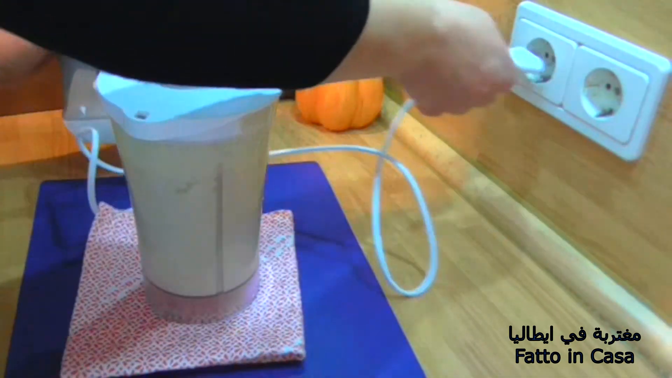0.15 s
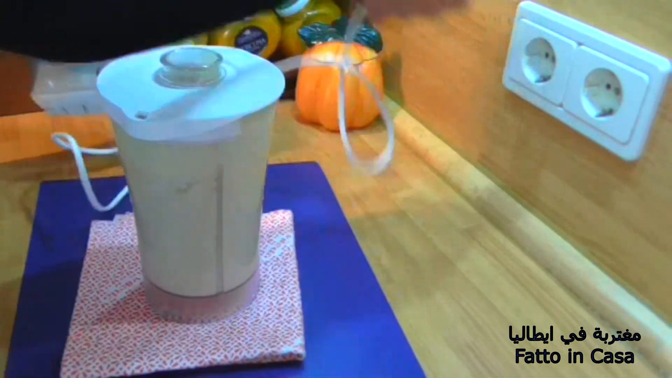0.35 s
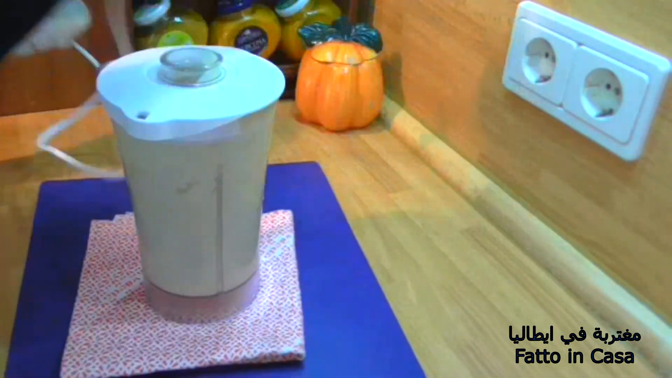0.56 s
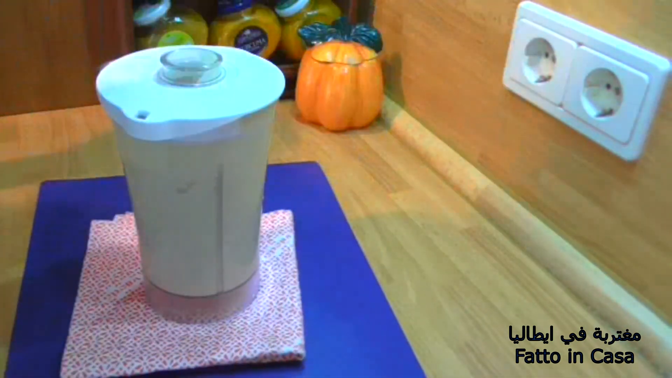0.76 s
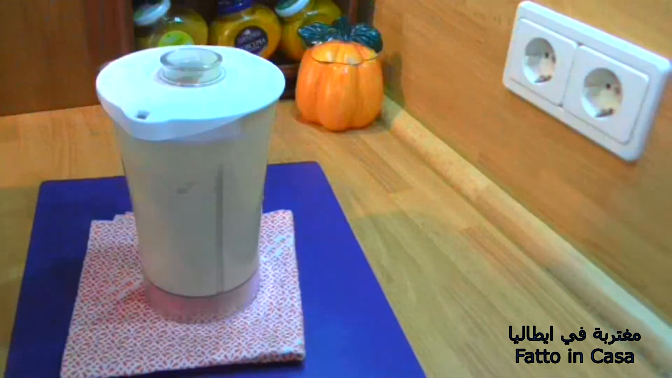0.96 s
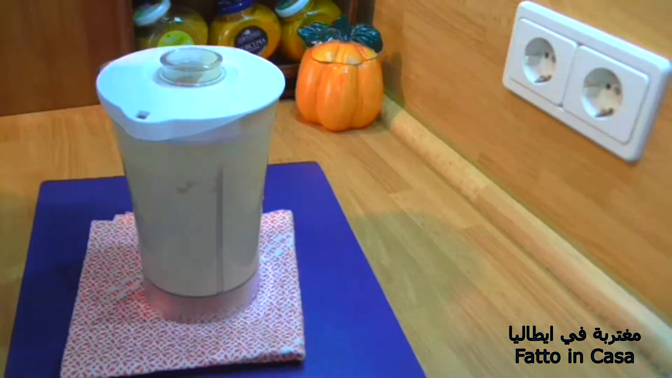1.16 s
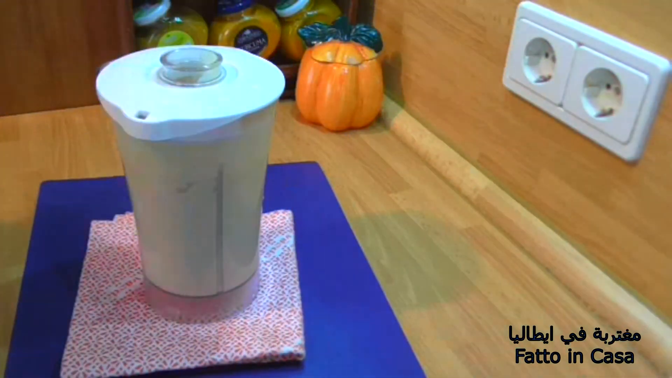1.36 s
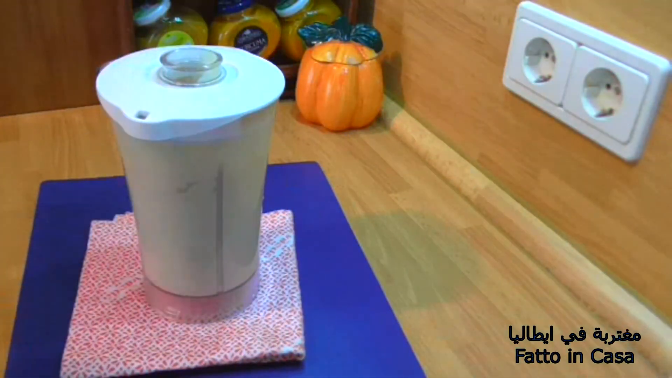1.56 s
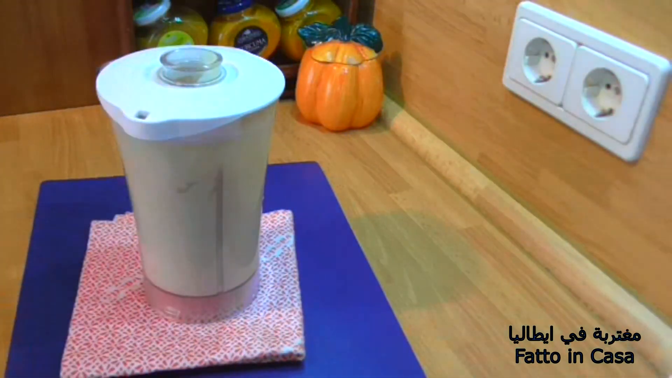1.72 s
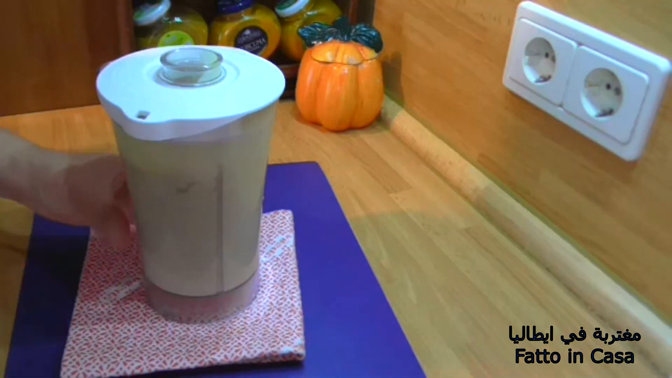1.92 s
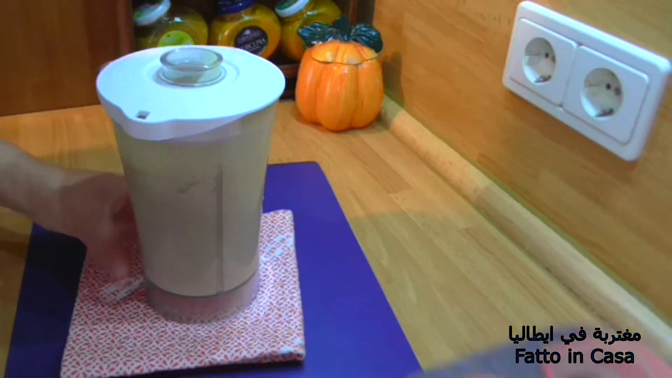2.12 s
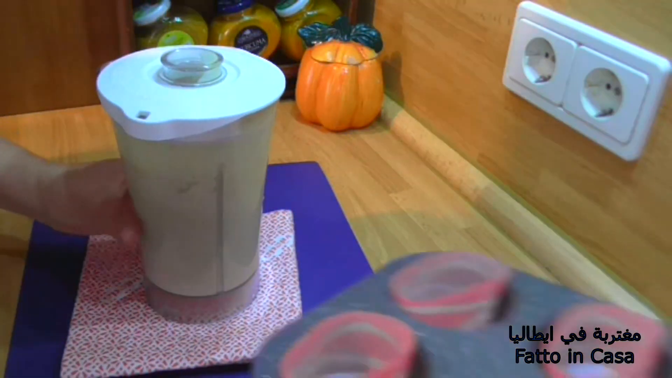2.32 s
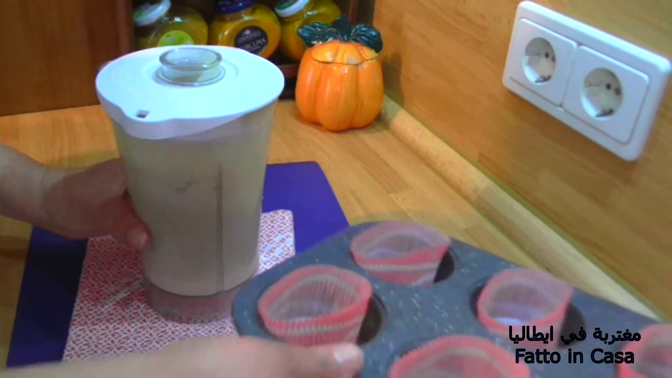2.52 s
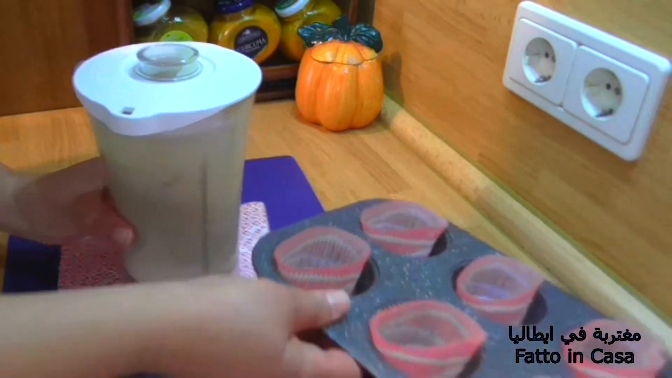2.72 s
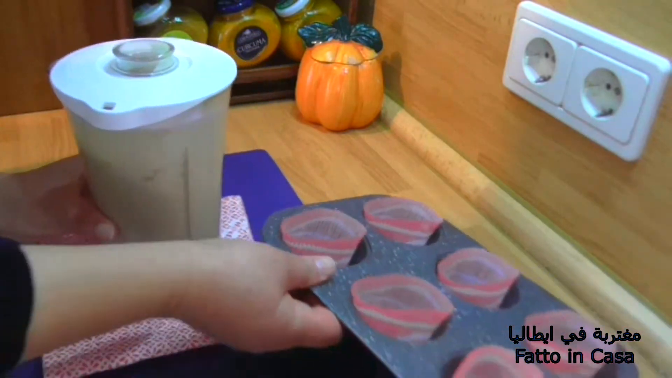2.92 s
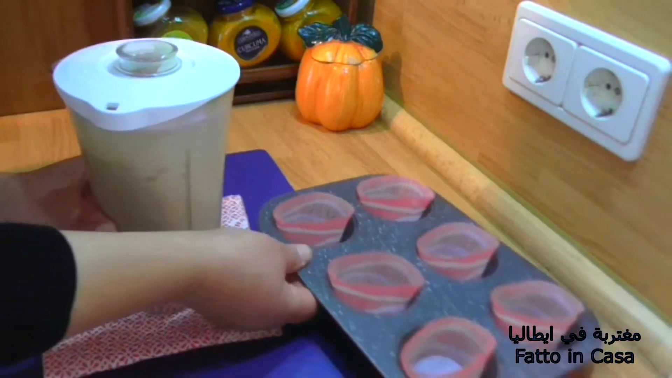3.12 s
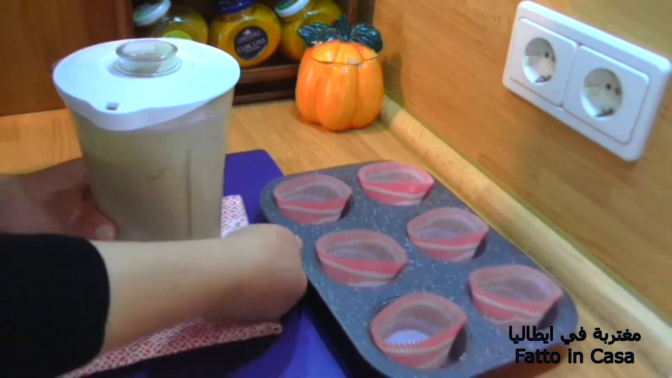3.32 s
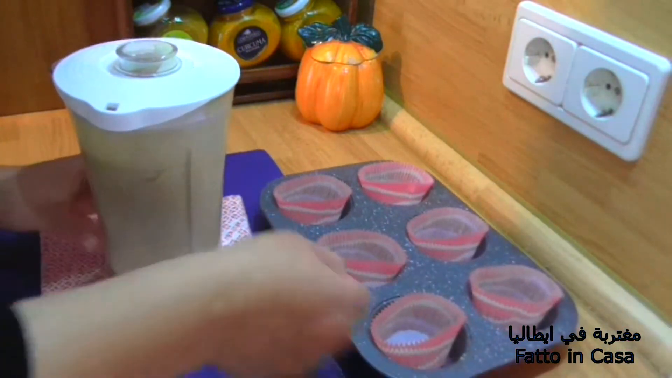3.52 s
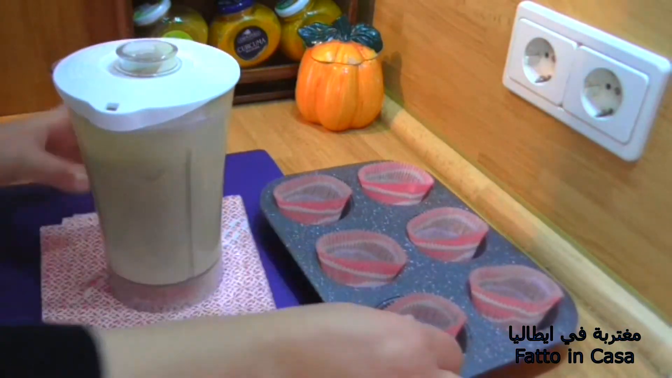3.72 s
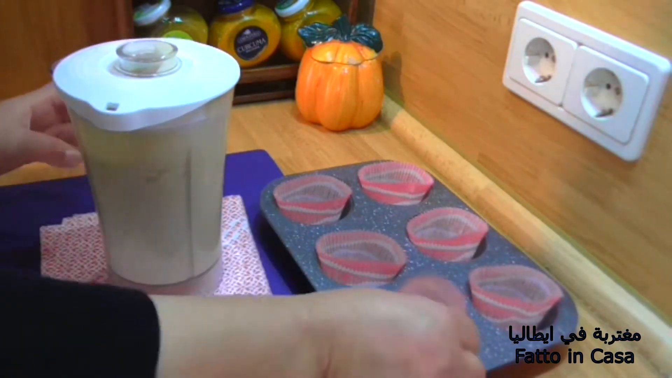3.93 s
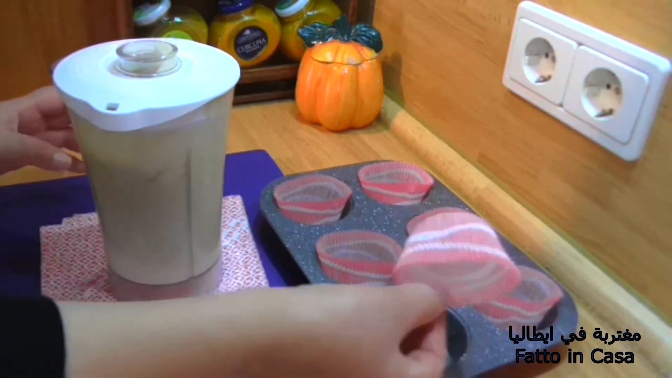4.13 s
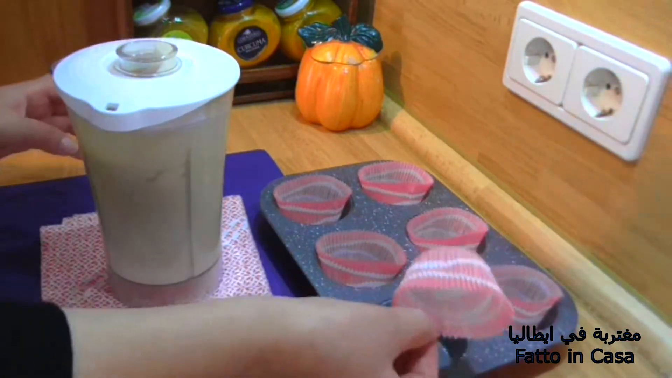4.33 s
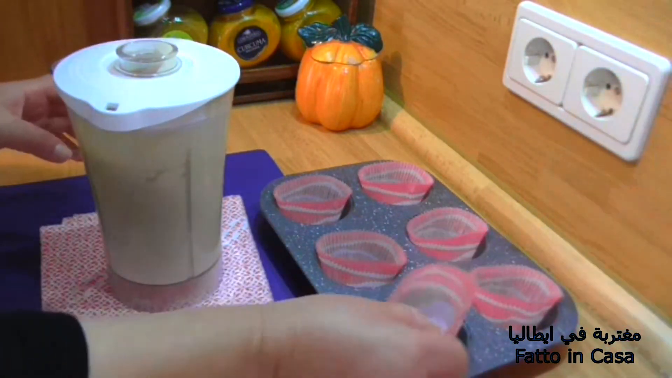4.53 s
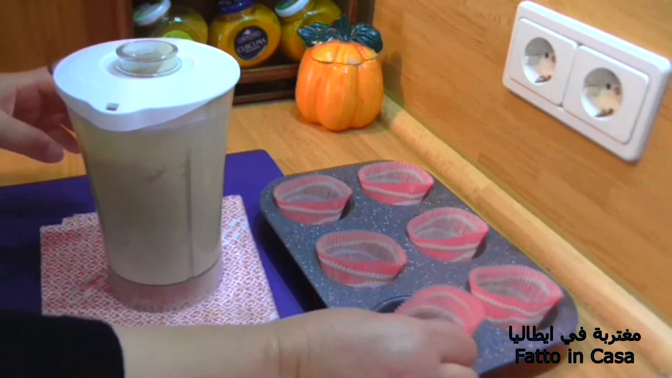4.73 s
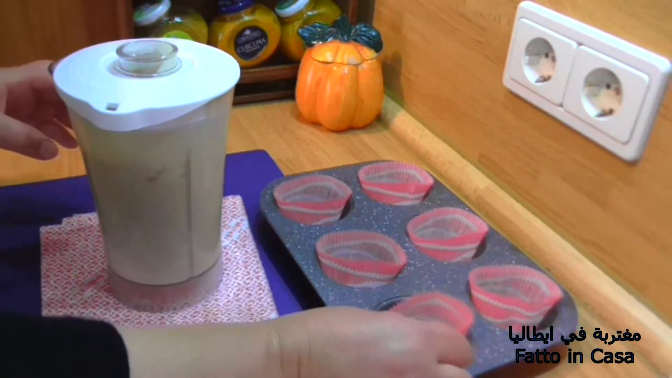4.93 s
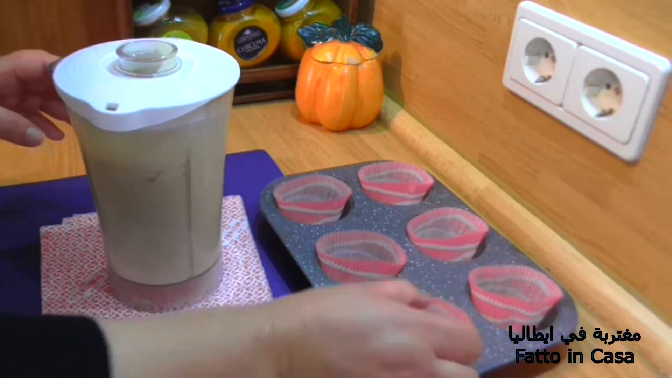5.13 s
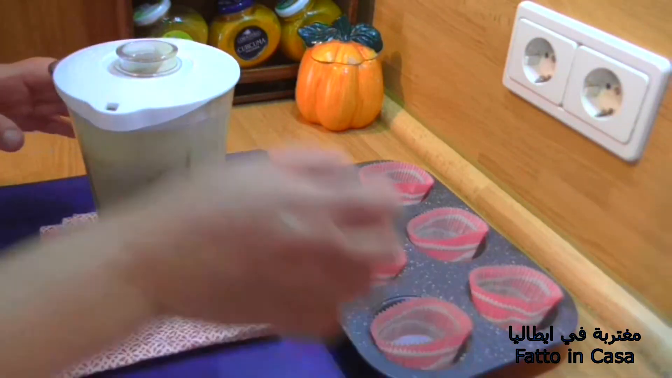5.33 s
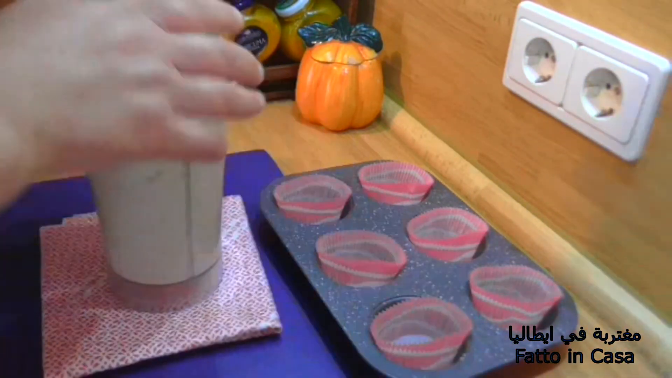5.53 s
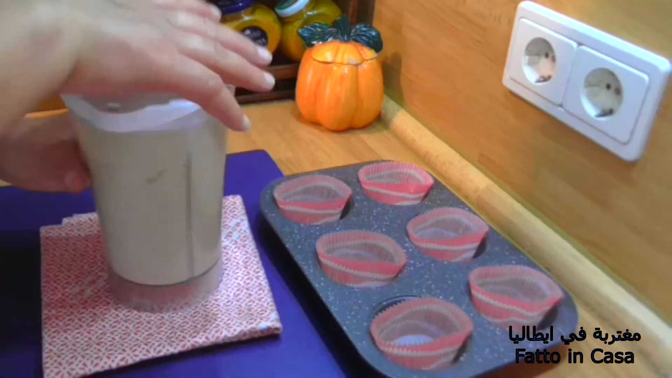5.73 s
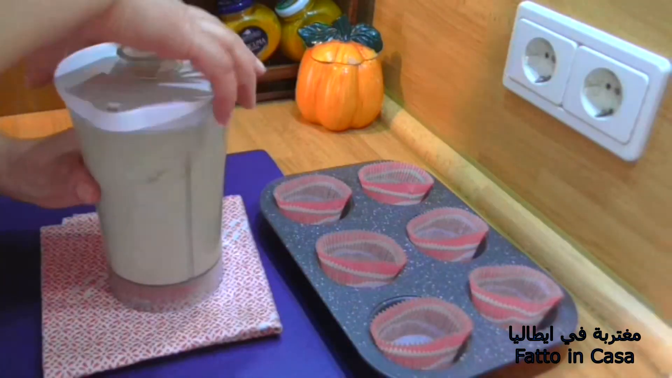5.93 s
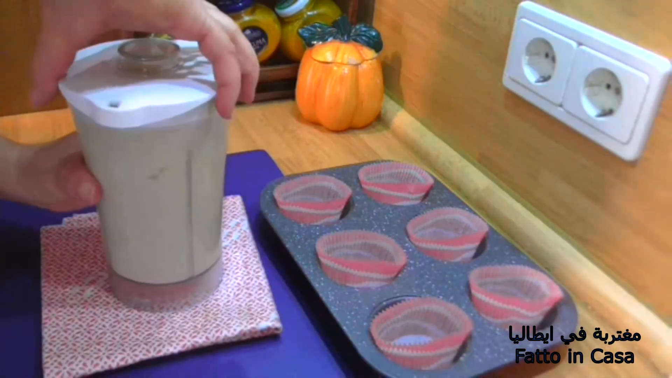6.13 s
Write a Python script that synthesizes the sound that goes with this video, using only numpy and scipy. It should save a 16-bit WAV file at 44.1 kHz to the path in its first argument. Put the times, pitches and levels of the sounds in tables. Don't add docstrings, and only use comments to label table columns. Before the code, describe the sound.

Hands work near a small microphone at a kitchen counter with short, bright echoes. First come sharp socket clicks and hard plastic knocks on wood, then a soft rising cable swish. A steel tin scrapes and rings briefly, then lands loudly with a clanging cluster and low counter thuds. Crisp paper crackles follow in two bouts, with sleeves brushing softly and very light plastic taps near the end.

```python
import sys
import numpy as np
from scipy import signal
from scipy.fft import rfft, irfft, next_fast_len
from scipy.io import wavfile
from scipy.ndimage import uniform_filter1d, map_coordinates

SR = 44100
rng = np.random.default_rng(int(sys.argv[2]) if len(sys.argv) > 2 else 0)


def dump(signal):
    limited = np.clip(np.atleast_2d(signal).T, -1, 1)
    pcm = np.round(limited * 32767).astype(np.int16)
    wavfile.write(sys.argv[1], SR, pcm)


def undo_db(level):
    steps = np.asarray(level, float) / 20
    return 10 ** steps


N = 276066
T = np.arange(SR * 2 // 5) / SR


def unit(x):
    return x / np.sqrt(np.mean(x ** 2) + 1e-20)


def along(points, hz):
    f, v = np.transpose(points)
    return np.interp(np.log(hz + 1), np.log(f + 1), v)


def curves(rows):
    s, *cols = np.transpose(rows)
    return [np.interp(np.arange(N) / SR, s, c, left=-150, right=-150) for c in cols]


def wobble(rate):
    knots = rng.standard_normal(int(N * rate / SR) + 4)
    return map_coordinates(knots, [np.arange(N) * rate / SR])


def filtered(x, response):
    n = x.shape[-1]
    m = next_fast_len(n + min(n, SR // 2))
    return irfft(rfft(x, m) * response(np.fft.rfftfreq(m, 1 / SR)), m)[..., :n]


def colour(spectrum):
    def response(hz):
        cep = irfft(np.log(undo_db(along(spectrum, hz)) + 1e-6))
        cep[1:len(hz) - 1] *= 2
        cep[len(hz):] = 0
        return np.exp(rfft(cep))
    return response


def resonant(peaks):
    def response(f):
        total = 0
        for k, (hz, width, db) in enumerate(peaks):
            total = total + (-1) ** k * undo_db(db) * 1j * f * width / (hz * hz - f * f + 1j * f * width)
        return total
    return response


def steep(peaks):
    top_hz = 1.2 * max(p[0] for p in peaks)
    return lambda f: resonant(peaks)(f) / (1 + 1.2j * f / top_hz - (f / top_hz) ** 2)


def ringing(spectrum, hz, width_hz, boost_db):
    return lambda f: colour(spectrum)(f) * (1 + undo_db(boost_db) * resonant([(hz, width_hz, 0)])(f))


def widths(modes):
    return [(hz, np.log(1000) / np.pi / t60, db) for hz, db, t60 in modes]


def burst(response, t60):
    n = SR // 5
    push = undo_db(-60 * T[:n] / t60) * rng.standard_normal(n)
    push[0] = 1.36
    x = filtered(push, response)
    return x / np.abs(x).max()


def ring(modes, free, spread_db, detune):
    x = np.zeros(len(T))
    for hz, db, t60 in modes:
        luck, shift = rng.standard_normal(2)
        decay = undo_db(db + spread_db * luck - 60 * T / (free * t60))
        x += decay * np.sin(2 * np.pi * hz * (1 + detune * shift) * T)
    x *= 1 - np.exp(-T / 0.0009)
    return x / np.abs(x).max()


def add(track, s, sound):
    part = track[round(s * SR):][:len(sound)]
    part += sound[:len(part)]


def gritty(rate, depth_db):
    return undo_db(depth_db * wobble(rate)) * rng.standard_normal(N)


def patchy(x, patchy_db):
    z = signal.stft(x, nperseg=256)[2]
    field = uniform_filter1d(rng.standard_normal(z.shape), size=4, axis=0)
    field = uniform_filter1d(field, size=8, axis=1)
    return signal.istft(z * undo_db(patchy_db * unit(field)), nperseg=256)[1][:N]


def strokes(rows, slower=1):
    t = np.arange(0, N / SR, 0.001)
    gain = np.zeros(len(t))
    for s, db, rise, fall in rows:
        away = np.where(t < s, (s - t) / rise, (t - s) / fall)
        gain += undo_db(db - 20 / slower * away)
    return np.interp(np.arange(N) / SR, t, gain)


def first(rows):
    return [row[:4] for row in rows]


def second(rows):
    return [(s, db + rel_db, rise, fall) for s, db, rise, fall, rel_db in rows]


def contacts(rows, modes, gain_db, spread_db):
    near_db, near_octaves = 9, 0.089
    stifle_db, stifle_s = 7, 0.006
    out = np.zeros(N)
    next_s = [row[0] for row in rows[1:]] + [N / SR]
    for (s, db, free, near_hz), after_s in zip(rows, next_s):
        struck = []
        for hz, level, t60 in modes:
            octaves = np.log2(hz / near_hz)
            struck.append((hz, level + near_db * np.exp(-(octaves / near_octaves) ** 2), t60))
        stifled = undo_db(-stifle_db * np.clip((T - after_s + s) / stifle_s, 0, 1))
        add(out, s, undo_db(db + gain_db) * stifled * ring(struck, free, spread_db, detune=0.003))
    return out


def sliding(pressure, modes, free, depth_db):
    body = steep(widths([(hz, db, free * t60) for hz, db, t60 in modes]))
    grit = gritty(90, depth_db)
    played, steady = filtered(np.array([pressure * grit, grit]), body)
    return played / np.std(steady)


# start in seconds, peak in dB, crack in dB, share of free ringing time,
# pitch in Hz of the modes nearest the contact.
TIN_BLOWS = [(2.917, 3, -11.5, 0.2, 1382), (2.946, -13.5, -41.5, .9, 1360), (3.007, -5.5, -21, 0.66, 705),
             (3.033, -10, -21.5, 0.74, 700), (3.050, -12.5, -36, 0.96, 730), (3.081, -14, -38.5, 0.71, 754),
             (3.112, -1, -24, 1.03, 885), (3.145, -6, -36.5, 0.49, 719), (3.172, -12, -34.5, 0.3, 890),
             (3.197, -8.5, -37, .6, 925), (3.214, -12, -34.5, 0.57, 890), (3.223, -12, -44.5, 2.6, 325),
             (3.241, -20, -28, 0.46, 1900), (3.257, -16, -38.5, 1, 1340), (3.282, -14.5, -28, 0.31, 690),
             (3.313, -20, -31, 0.35, 1915), (3.361, -17.5, -41, 1.1, 587), (3.392, -7.5, -30, 0.56, 665),
             (3.415, -11.5, -40.5, 0.37, 1327)]
# pitch in Hz, level in dB, t60 in seconds.
TIN_LYING = [(176.3, -8, 0.186), (328, -11, 0.415), (452, -14.5, 0.34), (508.6, -9, 0.19),
             (585.6, -6.5, .15), (681, -8, 0.24), (707.6, -4, 0.41), (838, -12, 0.044), (887.5, -3.5, 0.31),
             (973, -15.5, 0.037), (1087, -12, 0.083), (1167, -11.5, 0.143), (1231, -5.5, 0.15),
             (1359, -4, 0.29), (1410, -13, 0.15), (1516, -17, 0.33), (1570, -26, 0.12), (1755, -10.5, 0.44),
             (1916, -11, 0.12), (2120, -25, 0.35), (2747, -27, 0.12), (4264, -26, 0.36)]
# pitch in Hz, level in dB, t60 in seconds.
TIN_RIM = [(6520, -2.5, 0.32), (7430, -4, 0.1)]
# time in seconds, level in dB.
TIN_PUSH = [(2.93, -21.5), (3.0, -31), (3.06, -26), (3.1, -39.5), (3.14, -22), (3.3, -29), (3.38, -44),
            (3.44, -35), (3.5, -43)]


def tin_down():
    out = sliding(undo_db(curves(TIN_PUSH)[0] - 1), TIN_LYING, free=0.725, depth_db=8)
    rows = [(s, db, free, hz) for s, db, _, free, hz in TIN_BLOWS]
    out += contacts(rows, TIN_LYING, gain_db=-6, spread_db=2)
    damped_blow = steep([(770, 480, 0), (1312, 500, 0.59), (1900, 130, 0.5)])
    for s, db, crack_db, *_ in TIN_BLOWS:
        add(out, s, undo_db(db - 4) * burst(damped_blow, 0.051))
        add(out, s, undo_db(db + crack_db) * burst(colour(HARD_CRACK), 0.027))
        add(out, s, undo_db(db + crack_db - 31.5) * ring(TIN_RIM, 1, spread_db=4, detune=0.002))
    return out


# pitch in Hz, level in dB, t60 in seconds.
TIN_HELD = [(170.5, -1.5, 0.38), (246, -9.5, 0.16), (328, -5.5, 0.11), (444, -11, 0.1), (499, -12.5, 0.14),
            (682, -6.5, 0.33), (800, -3, 0.093), (911, -4, 0.14), (987, -4, 0.15), (1200, -17, 0.012),
            (1214.5, 0.5, 0.33), (1325, -5.5, 0.29), (1398, -1.5, 0.34), (1553, -8.5, 0.15),
            (1713, -17, 0.073), (1800, -23, 0.053), (2176, -18.5, 0.13), (2720, -32, .15),
            (4400, -33, 0.081)]
# peak in seconds, level in dB, rise in seconds, fall in seconds.
TIN_DRAG = [(1.79, -47.5, 0.018, 0.043), (1.875, -28.5, 0.039, 0.092), (1.95, -31, 0.053, 0.071),
            (2.015, -50, 0.053, 0.012)]
# peak in seconds, level in dB, rise and fall in seconds.
TIN_CARRY = [(2.26, -51.5, 0.092, 0.21), (2.42, -47, 0.12, 0.019), (2.55, -52.5, 0.11, 0.048),
             (2.88, -53, 0.44, 0.026)]
# start in seconds, peak in dB,
# pitch in Hz of the modes nearest the contact, thump relative to it in dB.
RIM_JOLTS = [(1.828, -33.5, 944, -14), (1.856, -29, 900, -8), (1.876, -34, 950, -12),
             (1.894, -30, 900, -12), (1.9115, -17, 1205, 3.5), (1.94, -19, 1250, -7),
             (1.975, -22.5, 1360, -12), (2.033, -54, 850, -6)]


def tin_out():
    out = sliding(strokes(TIN_DRAG), TIN_HELD, free=0.77, depth_db=-1)
    out += sliding(strokes(TIN_CARRY), TIN_LYING, free=0.6, depth_db=5.5)
    rows = [(s, db, 0.63, hz) for s, db, hz, _ in RIM_JOLTS]
    out += contacts(rows, TIN_HELD, gain_db=0.5, spread_db=4.5)
    thump = [(874, 6.5, 0.056), (1290, -2, 0.051), (4220, -27.5, 0.23)]
    for s, db, _, thump_db in RIM_JOLTS:
        add(out, s, undo_db(db + thump_db) * ring(thump, 0.9, spread_db=5, detune=0.014))
    return out


def tin():
    return tin_down() * undo_db([[-1.5], [1.5]]) + tin_out() * undo_db([[-3.5], [2.5]])


# start in seconds, peak in dB, ring in Hz, t60 in seconds,
# left over right in dB.
LANDINGS = [
    (0.687, -9.5, 2010, 0.011, -3.5),
    (0.728, -17, 2080, 0.021, -4.5),
    (1.137, -9, 2330, 0.037, -3.5),
]
# frequency in Hz, level in dB per Hz.
HARD_CRACK = [(120, -47.5), (200, -20.5), (600, -5.5), (1000, -4), (1780, -9), (2800, -6.5), (3500, -4.5),
              (4800, -5), (8500, -21), (10200, -19), (15500, -36.5)]


def drops():
    out = np.zeros((2, N))
    for s, db, hz, t60, pan_db in LANDINGS:
        crack = undo_db(-20.5) * ring([(hz, 0, 0.06)], 1, spread_db=1.2, detune=0.0022)
        add(crack, 0, burst(colour(HARD_CRACK), t60))
        add(out[0], s, undo_db(db + pan_db / 2) * crack)
        add(out[1], s, undo_db(db - pan_db / 2) * crack)
    return out


# start in seconds, peak in dB, ring in Hz.
PRONG_TICKS = [(0.0386, -49, 4200), (0.068, -38.5, 8600), (0.1073, -36.5, 4330), (0.164, -28, 4080),
               (0.181, -18.5, 5870), (0.2017, -23, 5440), (0.2252, -13.5, 6520), (0.237, -19, 6590),
               (0.28, -20.5, 5500)]
# frequency in Hz, level in dB per Hz.
SOCKET_CLICK = [(880, -30), (1500, -23), (1690, -39), (2640, -9), (2860, -15), (6690, 0), (8970, -9.5),
                (13100, -4.5), (14500, -17.5), (15500, -17.5)]
# peak in seconds, level in dB, rise and fall in seconds.
CABLE_DRAG = [
    (0.316, -37.5, 0.035, 0.078),
    (0.494, -47.5, 0.052, 0.044),
]
# pitch in Hz, width in Hz, level in dB.
CABLE_SHEATH = [(3500, 460, -1), (4600, 930, -3), (5260, 640, 0), (6340, 1200, -6)]


def plug():
    scrape = unit(filtered(patchy(gritty(51.1, depth_db=5), patchy_db=1), resonant(CABLE_SHEATH)))
    out = undo_db(-0.5) * strokes(CABLE_DRAG) * scrape * undo_db([[-3.5], [3]])
    for s, db, hz in PRONG_TICKS:
        prong = burst(steep([(hz, 900, 0), (0.76 * hz, 1500, -10)]), 0.024)
        for side, ring_db, click_db in zip(out, (-6, 0.5), (-8, 2)):
            add(side, s, undo_db(db + ring_db) * prong)
            add(side, s, undo_db(db + click_db) * burst(colour(SOCKET_CLICK), 0.016))
    return out


# peak in seconds, level in dB, rise in seconds, fall in seconds,
# cup air relative to the rustle in dB.
LINER_RUB = [(2.22, -42.5, 0.013, 0.03, 0), (2.263, -44, 0.013, 0.11, 4), (2.424, -37, 0.043, 0.12, -3),
             (2.568, -43.5, 0.023, 0.018, 8.5), (2.759, -42, .12, 0.37, 3.5),
             (3.875, -28.5, 0.0064, .16, -3.5), (3.954, -30, 0.074, 0.027, 2),
             (4.003, -33, .045, 0.015, 7.5), (4.03, -61, 0.011, 0.085, 19), (4.762, -33.5, 0.1, 0.13, 5.5),
             (4.885, -37, 0.016, 0.029, 4.5), (4.995, -34.5, 0.057, 0.04, -0.5),
             (5.061, -35.5, 0.037, 0.087, 1.5), (5.14, -48.5, 0.014, 0.03, -6)]
# peak in seconds, level in dB, rise and fall in seconds.
LINER_SHAKE = [(1.849, -56, 0.056, 0.039), (1.929, -45, 0.12, 0.28), (3.13, -46, 0.008, 0.57),
               (3.298, -48.5, 0.47, 0.1), (3.342, -54, .05, 0.1), (3.452, -77, .03, 0.052)]
# frequency in Hz, level in dB per Hz.
PAPER_RUSTLE = [(1180, -31), (2000, -13.5), (2600, -12.5), (3150, -8.5), (3700, -1.5), (4970, -0.5),
                (5360, -3.5), (5880, -3.5), (11200, -11), (15000, -23.5)]
# pitch in Hz, width in Hz, level in dB.
CUP_AIR = [(1273, 300, -1.5), (1515, 100, 7.5), (1700, 44, 9), (2130, 970, -5.5), (688, 450, -12)]


def rustle():
    clumps = undo_db(0.51 * wobble(70) + 2.05 * wobble(500))
    folds = unit(filtered(patchy(clumps * rng.standard_normal(N), patchy_db=2.5), colour(PAPER_RUSTLE)))
    hollow = unit(filtered(clumps * rng.standard_normal(N), steep(CUP_AIR)))
    rubbing = strokes(first(LINER_RUB) + LINER_SHAKE)
    lingering = strokes(second(LINER_RUB), slower=1.2)
    return undo_db(-7.5) * (rubbing * folds + lingering * hollow)


# start in seconds, peak in dB, cup air relative to it in dB.
PLEAT_SNAPS = [(2.2169, -40, -13), (2.2633, -42.5, -19), (2.3842, -40, 0), (2.4917, -40.5, -12.5),
               (2.5647, -27.5, -2), (2.6462, -40, -15), (3.822, -34.5, -2), (3.8758, -28, -12),
               (3.913, -26, 4), (3.953, -35, 9.5), (4, -25.5, 0), (4.4865, -49.5, 15.5), (4.524, -56, 11),
               (4.547, -51.5, 12.5), (4.597, -60, 12), (4.6234, -49.5, 13), (4.6667, -36, 9),
               (4.732, -39.5, 16), (4.7522, -30.5, 4.5), (4.7893, -35, -16.5), (4.8299, -52.5, 17),
               (4.8842, -45, -8), (4.9806, -29.5, -3), (4.999, -25.5, -8.5), (5.056, -36, 2),
               (5.143, -37, 1.5)]
# start in seconds, peak in dB.
PLEAT_TICKS = [(1.85, -38.5), (2.013, -41.5), (2.057, -46), (3.232, -34), (3.2766, -37), (3.2984, -42),
               (3.334, -40.5), (3.4512, -43.5)]


def snaps():
    out, t60_s = np.zeros(N), 0.055
    for s, db, *_ in PLEAT_SNAPS + PLEAT_TICKS:
        hz = 5430 * np.exp(0.12 * rng.standard_normal())
        add(out, s, undo_db(db) * burst(ringing(PAPER_RUSTLE, hz, width_hz=1300, boost_db=1.5), t60_s))
    for s, db, cup_db in PLEAT_SNAPS:
        add(out, s, undo_db(db + cup_db - 2) * burst(steep(CUP_AIR), t60_s))
    return out


# start in seconds, level in dB, length in seconds, pitch in Hz.
FOLD_SQUEAKS = [(3.9125, -20, .011, 1530), (3.952, -30, 0.0092, 1550), (4.731, -34, .006, 1606),
                (4.744, -35, .004, 1600)]


def squeaks():
    out = np.zeros(N)
    for s, db, length_s, hz in FOLD_SQUEAKS:
        gate = np.clip(1 + (length_s - T) / 0.0035, 0, 1)
        add(out, s, undo_db(db) * gate * np.sin(2 * np.pi * hz * T))
    return out


# start in seconds, peak in dB, pitch in Hz.
SOFT_KNOCKS = [(0.87, -38, 328), (1.084, -48, 640), (1.607, -31, 730), (1.684, -33.5, 270),
               (3.8269, -21.5, 986), (3.836, -16, 718), (4.667, -32.5, 343), (4.827, -40, 527),
               (5.369, -45, 328), (5.539, -43.5, 322)]


def knocks():
    out, t60_s = np.zeros(N), 0.095
    for s, db, hz in SOFT_KNOCKS:
        puff = steep([(hz, 0.053 * hz, 0), (0.17 * hz, 0.13 * hz, -8), (1.7 * hz, 0.42 * hz, -9)])
        add(out, s, undo_db(db - 4.5) * ring([(hz, 0, t60_s)], 0.72, spread_db=1, detune=0.002))
        add(out, s, undo_db(db - 2) * burst(puff, t60_s))
    return out


# start in seconds, peak in dB.
SHELL_RATTLE = [(0.151, -21), (0.168, -37.5), (0.183, -34), (0.197, -31.5), (0.216, -30), (0.241, -29),
                (0.266, -32.5), (0.29, -35), (0.31, -41), (0.335, -37)]
# start in seconds, peak in dB.
NAIL_TAPS = [(1.082, -25.5), (5.596, -40), (5.649, -40), (5.7, -45.5)]


def rattle_and_taps():
    out = np.zeros(N)
    shell = steep([(573, 70, 0), (145, 60, 1), (1400, 1800, -14)])
    wall = steep([(556, 610, 3.5), (2030, 2900, -5.5)])
    for s, db in SHELL_RATTLE:
        add(out, s, undo_db(db) * burst(shell, 0.08))
    for s, db in NAIL_TAPS:
        add(out, s, undo_db(db) * burst(wall, 0.037))
    return out


# start in seconds, peak in dB, pitch in Hz.
WEIGHT_THUDS = [
    (0.163, -29, 144),
    (2.917, -12.5, 199.3),
    (3.11, -20, 173),
    (3.39, -41, 179),
    (3.828, -24.5, 188),
]
# peak in seconds, level in dB, rise and fall in seconds.
COUNTER_BOOM = [(0.15, -51, 0.0085, 0.11), (1.15, -50, 0.076, 0.11), (1.69, -40.5, 0.013, 0.72),
                (4.68, -56, .01, 0.23), (1.936, -46.5, 0.39, .2), (2.94, -35.5, 0.0056, 0.013),
                (3.04, -49.5, 0.12, 0.2), (3.12, -37.5, 0.027, 0.69), (3.3, -42.5, 0.2, 0.047),
                (3.402, -37.5, 0.023, 0.098), (3.84, -34, 0.0081, 0.036), (3.96, -53, 0.12, 0.061)]
# pitch in Hz, width in Hz, level in dB.
COUNTER_TOP = [(88.6, 29, 3), (134, 75, -1.5), (188, 32, -2)]


def counter():
    t60_s = 0.094
    boom = unit(filtered(gritty(30, depth_db=1.5), steep(COUNTER_TOP)))
    out = undo_db(-1.5) * strokes(COUNTER_BOOM) * boom
    for s, db, hz in WEIGHT_THUDS:
        notes = [(hz, 0, t60_s), (1.14 * hz, -5, t60_s)]
        add(out, s, undo_db(db) * ring(notes, 0.66, spread_db=0, detune=0.012))
    return out


# time in seconds, level in dB, pitch in Hz.
CABLE_SWISH = [(1.55, -52, 393.6), (1.59, -46, 655), (1.612, -38.5, 791), (1.63, -41, 1500),
               (1.645, -48.5, 1900), (1.68, -76, 1830)]


def swish():
    db, hz = curves(CABLE_SWISH)
    slow = unit(filtered(rng.standard_normal(N), lambda f: 1 / (1 + (f / 330) ** 2)))
    carrier = np.sin(2 * np.pi * np.cumsum(np.abs(hz)) / SR)
    return np.sqrt(2) * undo_db(db) * slow * carrier


# left delay in seconds, right delay in seconds, level in dB.
NEAR_WALLS = [(.0013, .0019, -14), (.0031, 0.0023, -8.5), (.0052, 0.0054, -19), (.0093, 0.0075, -10)]


def walls(x):
    def echo(hz):
        total = 1
        for left, right, db in NEAR_WALLS:
            total = total + undo_db(db) * np.exp(-2j * np.pi * hz * np.array([[left], [right]]))
        return total
    return filtered(x, echo)


# frequency in Hz, t60 in seconds.
ROOM_T60 = [(100, 0.37), (600, 0.77), (2000, 0.36), (6000, 0.22), (14000, 0.22)]


def room(x):
    out, step = np.zeros((2, N)), SR // 4
    for start in range(0, N, step):
        hz, t, z = signal.stft(rng.standard_normal((2, SR // 2)), SR, nperseg=256)
        decay = undo_db(-60 * t / along(ROOM_T60, hz)[:, None])
        tail = signal.istft(z * decay, SR, nperseg=256)[1]
        tail = 0.67 * tail[:1] + 0.5 * tail
        tail = tail / np.linalg.norm(tail[0])
        wet = signal.fftconvolve(x[None, start:start + step], tail, axes=1)
        for side in range(2):
            add(out[side], start / SR + 0.004, wet[side])
    return out


# frequency in Hz, left-right correlation.
PORTS_ALIKE = [(60, 0.11), (240, 0.021), (950, 0.46), (3770, -0.064), (15000, 0.082)]


def rush(spectrum):
    def mid_side(hz):
        turn = np.arccos(np.clip(along(PORTS_ALIKE, hz), -1, 1)) / 2
        return undo_db(along(spectrum, hz)) * [np.cos(turn), np.sin(turn)]
    mid, side = filtered(rng.standard_normal((2, N)), mid_side)
    return unit(np.array([mid + side, mid - side]))


# peak in seconds, level
# in dB, rise in seconds, fall in seconds, hiss relative to the body of the sound in dB.
SLEEVE_MOVES = [(0.15, -61, 0.27, 0.64, -1), (1.499, -52.5, 2, 0.59, -2.5), (2.5, -68.5, 0.88, 0.78, -13),
                (2.969, -50, 0.39, 0.15, 3), (3.12, -40, 0.079, 0.44, -23), (3.3, -42, 0.13, 0.26, -27),
                (3.979, -54.5, 0.21, 0.19, -12.5), (4.7, -48, 0.13, 0.44, -12),
                (5.418, -52, 0.24, 0.13, -4), (5.964, -71, 0.25, 0.07, 13), (6.076, -66, 0.16, 0.33, 9.5),
                (6.0, -64.5, 4.6, 5.2, -19)]
# frequency in Hz, level in dB per Hz.
CLOTH_BODY = [(88, -35), (150, -8), (701, 1.5), (789, 0.5), (1490, -1.5), (2620, -23), (3500, -41.5),
              (4550, -71), (7700, -120)]
# frequency in Hz, level in dB per Hz.
CLOTH_HISS = [(1470, -5.5), (2500, -3.5), (2870, -4.5), (4820, -2.5), (6690, -11.5), (10300, -14),
              (15500, -39)]
# frequency in Hz, level in dB per Hz.
ROOM_TONE = [(15, -47), (25, -25.5), (70, -11), (116, 0.5), (194, -8.5), (390, -3), (1350, -17),
             (1860, -9.5), (2860, -19.5), (4650, -19), (7150, -27), (13700, -26), (15600, -25.5)]


def background():
    cloth = strokes(first(SLEEVE_MOVES)) * undo_db(2 * wobble(32)) * rush(CLOTH_BODY)
    hiss = strokes(second(SLEEVE_MOVES)) * undo_db(2.2 * wobble(25)) * rush(CLOTH_HISS)
    return cloth + hiss + undo_db(-59 + 0.8 * wobble(1.9)) * rush(ROOM_TONE)


def scene():
    steel, landing, socket = tin(), drops(), plug()
    liner = rustle() + snaps() + squeaks()
    soft = knocks() + rattle_and_taps() + counter() + swish()
    near = socket + landing + steel
    near += soft * undo_db([[-1.5], [1.5]]) + liner * undo_db([[-2.5], [2.2]])
    wet = undo_db(-10.5) * (socket.mean(axis=0) + soft) + undo_db(-5) * landing.mean(axis=0)
    wet += undo_db(-15) * steel.mean(axis=0) + undo_db(-24) * liner
    heard = undo_db(-0.5) * walls(near) + room(wet)
    low_cut = lambda hz: (1j * hz / (90 + 1j * hz)) ** 3
    return filtered(heard, low_cut) + background()


def low_pass(x):
    return signal.sosfilt(signal.butter(12, 15770, fs=SR, output="sos"), x)


def record(dry):
    lag_s, top_hz = np.array([[1], [-1]]) * 0.9e-5, 15900
    x = filtered(dry, lambda hz: np.exp(-2j * np.pi * hz * lag_s) * (hz < top_hz))
    return low_pass(np.clip(x, -1, 1))


dry = scene()
out = record(dry)
dump(out)
```